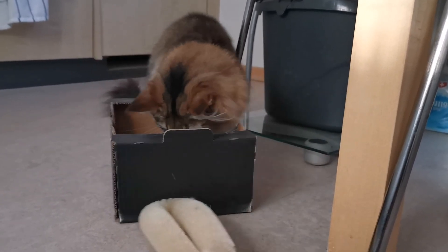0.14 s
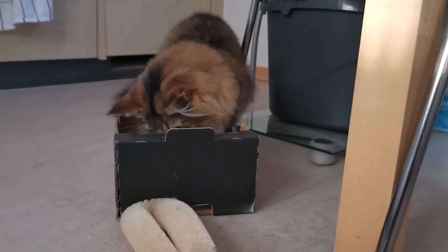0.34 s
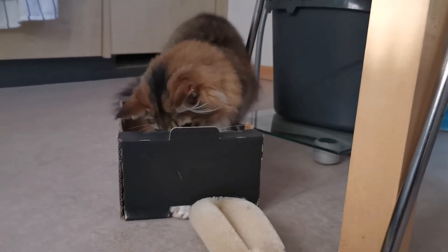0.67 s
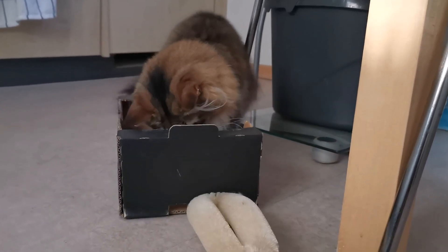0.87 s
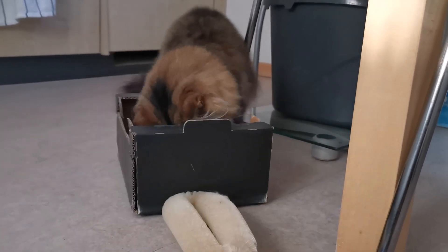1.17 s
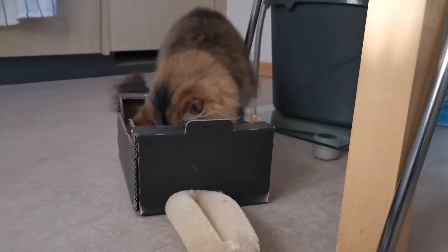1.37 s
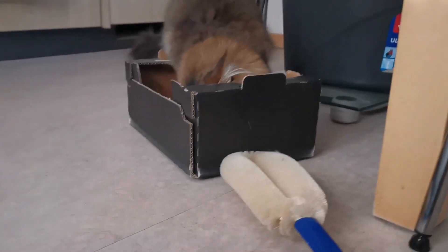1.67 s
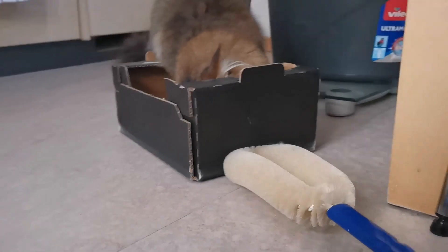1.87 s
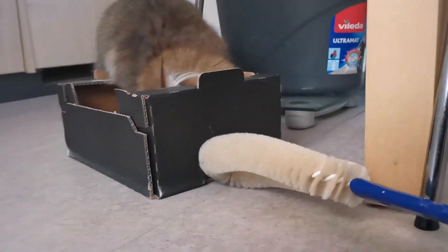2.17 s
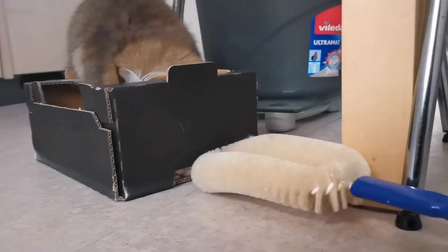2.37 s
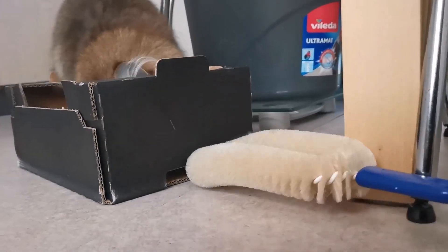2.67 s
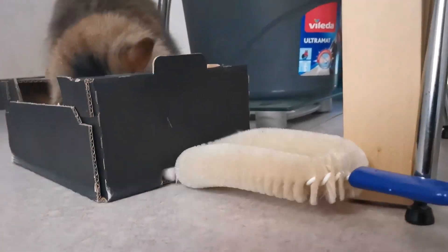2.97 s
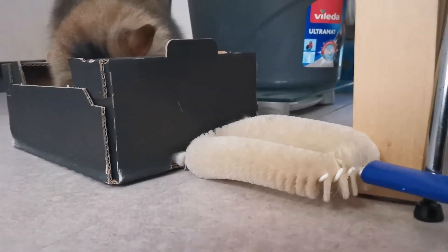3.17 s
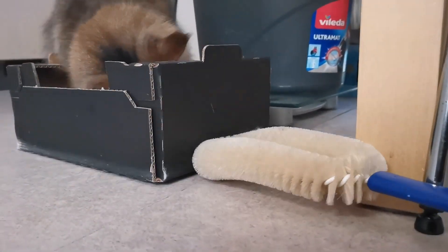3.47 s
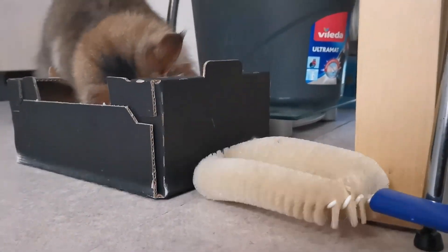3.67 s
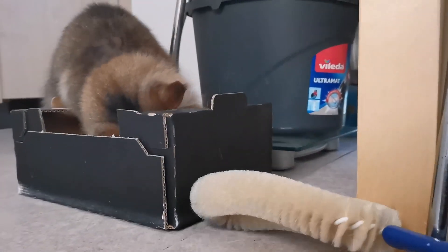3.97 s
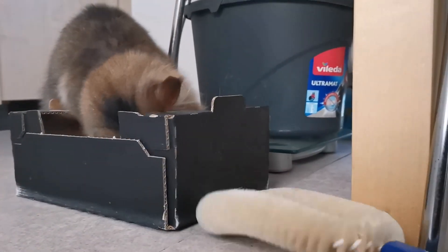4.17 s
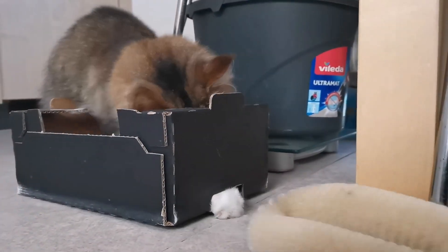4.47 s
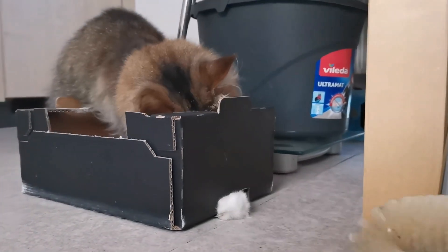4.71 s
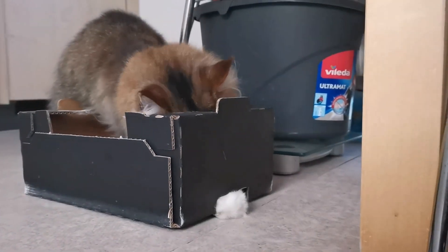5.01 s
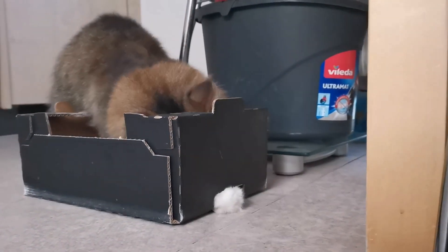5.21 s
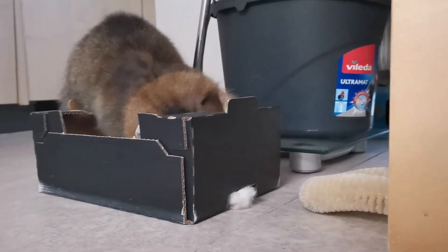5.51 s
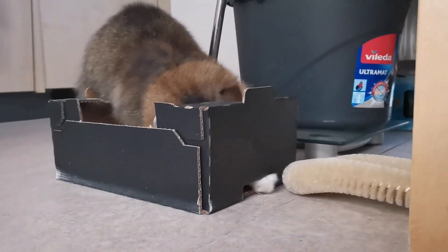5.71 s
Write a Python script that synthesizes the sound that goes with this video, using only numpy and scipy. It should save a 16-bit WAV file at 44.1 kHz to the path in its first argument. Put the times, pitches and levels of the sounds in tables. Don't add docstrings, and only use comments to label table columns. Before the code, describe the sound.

A quiet room with soft steady hiss, heard through a handheld phone near a cat and a cardboard box on a hard floor. At 0.15 s a heavy paw thump rings the hollow box with a short scrape; a weaker one follows at 0.6 s. A bright claw scratch snaps at 0.8 s, then crisp ticks, knocks and rasping at 1.25-1.3 s and again at 1.75-1.85 s. Softer rubbing follows, with light raps near 2.55 s. From 2.8 to 3.7 s knocks and scrapes cluster, with hollow slaps at 3.03 and 3.62 s, while the box creeps with a faint low stick-slip hum. After 4 s it is mostly faint brushing and tiny taps, a small rap at 4.6 s, a short dry rasp at 5.14 s and light taps at 5.4 and 5.6 s. Low grip rumble, bumps and small case clicks come mainly from the right, strongest around 3.9 and 5.3-5.7 s.

```python
import sys
import numpy as np
from scipy import signal
from scipy.fft import rfft, irfft, next_fast_len
from scipy.io import wavfile

SR = 44100
rng = np.random.default_rng(int(sys.argv[2]) if len(sys.argv) > 2 else 0)


def how_loud(loudness_db):
    steps = np.asarray(loudness_db, float) / 20
    return 10 ** steps


def pcm_store(signal):
    levels = np.round(np.clip(np.atleast_2d(signal), -1, 1) * 32767)
    wavfile.write(sys.argv[1], SR, levels.astype(np.int16).T)


N = 257984
SIZE = next_fast_len(N + SR // 2)
HZ = np.maximum(np.arange(SIZE // 2 + 1) * SR / SIZE, 1)
KNOCK_DELAY_S = .002


def in_time(rows):
    s, *columns = np.transpose(rows)
    return [np.interp(np.arange(N) / SR, s, c) for c in columns]


def at_hz(points):
    hz, values = np.transpose(points)
    return np.interp(np.log(HZ), np.log(hz), values)


def rms_one(x):
    return x / np.sqrt(np.mean(x ** 2) + 1e-20)


def drift(rate_hz):
    r = np.exp(-80 * np.pi * rate_hz / SR)
    slow = signal.lfilter([1], [1, -2 * r, r * r], rng.standard_normal(N // 40 + 2002))[2000:]
    return np.interp(np.arange(N) / 40, np.arange(len(slow)), rms_one(slow))


def friction(per_s, spread_db, clump_db):
    sizes = how_loud(spread_db * np.minimum(rng.exponential(1, (3, N)), 4.2)) * rng.choice([-1, 1], (3, N))
    caught = rng.random((3, N)) < per_s / SR
    return rms_one(sizes * caught * how_loud(clump_db * drift(47)))


def resonances(rows):
    return sum(how_loud(db) * 1j * HZ * width / (hz ** 2 - HZ ** 2 + 1j * HZ * width) for hz, width, db in rows)


def echoes(t60_s, gap_ms):
    t = np.arange(SR // 2) / SR - gap_ms / 1000
    cloud = rng.standard_normal((2, SR // 2)) * how_loud(-60 * t / t60_s) * (t > 0)
    return rfft(cloud / np.sqrt(np.sum(cloud ** 2, axis=1, keepdims=True)), SIZE)


# (frequency [Hz], left minus right [dB])
PORT_TILT = [(60, 34), (200, 0), (800, 0.5), (2300, -0.5), (3800, -2), (4900, 7), (5800, -2.5), (6350, 12),
             (6700, 10), (7000, 13.5), (8300, 15.5), (11000, 4), (14000, 5)]
# (frequency [Hz], lead of left [rad])
PORT_LEAD = [(0, 0), (600, .1), (1030, -.8), (1550, .3), (2240, .7), (3100, 3.1), (5080, 3.4), (5860, 6.3),
             (15400, 6.2)]


def ports():
    lead_rad = np.interp(HZ, *np.transpose(PORT_LEAD))
    half = how_loud(at_hz(PORT_TILT) / 2) * np.exp(.5j * lead_rad)
    return np.array([half, 1 / half])


# (frequency [Hz], density [dB per Hz])
HUSH_SPECTRUM = [(59, -39), (100, -5), (291, 1.5), (337, 3), (434, 2), (962, -8.5), (1090, -0.5), (1460, 0),
                 (2370, -6), (2800, -13), (3180, -9), (4000, -10), (5000, -9), (6100, -5), (7400, -4.5),
                 (8300, -20), (10100, -47), (15000, -23)]
# (frequency [Hz], share [0-1])
DIRECT_SHARE = [(200, 1), (650, .97), (1100, .6), (1350, .45), (1800, .45), (2100, .7), (2900, .89),
                (3500, .82), (3900, .55), (4700, .4), (5400, .55), (6100, .92), (7400, .88), (7900, .15),
                (9500, .2), (14500, .75)]


def hush():
    both, *own = rfft(rng.standard_normal((3, N)), SIZE)
    share = np.clip(at_hz(DIRECT_SHARE) - .1, 0, 1)
    white = share * both + np.sqrt(1 - share ** 2) * np.array(own)
    hiss = irfft(white * how_loud(at_hz(HUSH_SPECTRUM)) * ports(), SIZE)[:, :N]
    return how_loud(-57.5 + 0.62 * drift(6.4)) * rms_one(hiss)


# (time [s], level [dB])
GRIP_RUMBLE = [(0, -69), (.5, -74.5), (1.14, -70.5), (1.32, -57), (1.45, -65), (1.71, -57), (1.99, -66.5),
               (2.3, -62), (2.83, -68), (3.19, -57.5), (3.5, -65), (3.93, -51.5), (4.09, -67.5),
               (5.08, -67), (5.53, -56), (5.85, -72)]


def rumble():
    low = signal.butter(1, [22, 110], "band", fs=SR, output="sos")
    top = signal.butter(2, 330, fs=SR, output="sos")
    lumps = how_loud(1.83 * drift(42))
    right, own = signal.sosfilt(np.vstack([low, top]), rng.standard_normal((2, N))) * lumps
    pair = np.array([how_loud(-11.5) * right + how_loud(-13) * own, right]) / np.std(right)
    return how_loud(in_time(GRIP_RUMBLE)[0] + 10) * pair


# (time [s], peak [dB], pitch [Hz], length [cycles], left minus right [dB])
GRIP_BUMPS = [(0.871, -45, 91.5, 1.4, -1), (1.234, -31, 76.5, 1, -21), (1.47, -48, 83.4, 2.3, -24),
              (1.749, -31, 146, 2, -15), (1.921, -38.5, 159, 2.2, -26), (2.449, -38.5, 118, 1.5, -21),
              (2.774, -27.5, 56, 2.65, -14), (3.049, -38, 50.7, 1.4, -11), (3.699, -37, 118, 2.4, -14),
              (3.893, -30, 165, 2, -29), (3.915, -33, 105, 1.4, -20), (3.958, -37, 66, 1.7, -14),
              (5.089, -36.5, 67.5, 0.75, -26), (5.316, -32.5, 56.5, 0.6, -23),
              (5.541, -29.5, 103, 1.7, -24), (5.589, -41, 61.9, 1.8, -20), (5.716, -38, 156, 3.4, -16)]


def bumps():
    out, t = np.zeros((2, N)), np.arange(4000) / SR
    for s, peak_db, hz, cycles, pan_db in GRIP_BUMPS:
        phase = np.minimum(t * hz / cycles, 1)
        pulse = np.sin(2 * np.pi * hz * t) * np.sin(np.pi * phase ** .6) ** 2.2
        peak_s = 0.345 * cycles / hz
        creak = np.sin(2 * np.pi * 480 * t) * np.exp(-((t - peak_s) / .0016) ** 2)
        at = round(s * SR)
        out[:, at:at + 4000] += how_loud(peak_db + 4.5) * (pulse + how_loud(-18) * creak) * how_loud([[pan_db], [0]])
    return out


# (time [s], peak [dB])
CASE_CLACKS = [(3.8945, -36), (3.9675, -27), (5.09, -44), (5.3154, -30), (5.49, -42), (5.5445, -38),
               (5.7208, -35)]


def clacks():
    out, t = np.zeros((2, N)), np.arange(4000) / SR
    ring = np.sin(2 * np.pi * 450 * t) * np.exp(-t / .0012)
    for s, peak_db in CASE_CLACKS:
        at = round(s * SR)
        out[:, at:at + 4000] += how_loud(peak_db + 3.5) * ring * how_loud([[-15], [0]])
    return out


# (time [s], level [dB])
CREEP_LEVEL = [(2.84, -64), (2.904, -64), (3.052, -53), (3.572, -54), (3.62, -57)]
# (frequency [Hz], width [Hz], level [dB])
CREEP_MODES = [(455, 40, 0), (600, 60, -6), (1760, 43, -7), (2370, 110, -12)]


def creep():
    rings = resonances(CREEP_MODES) / (1 + (HZ / 3000) ** 6)
    hum = rms_one(irfft(rfft(friction(2500, 2.5, 1.5)[0], SIZE) * rings, SIZE)[:N])
    s, db = np.transpose(CREEP_LEVEL)
    return hum * how_loud(np.interp(np.arange(N) / SR, s, db + 3.5, left=-120, right=-120))


# (time [s], level [dB], tilt above the main mode [dB per octave])
BOX_SLAPS = [(.1575, -22.5, 6.5), (.6215, -25.5, 1), (1.8145, -30, 9), (1.836, -30, 6), (3.029, -32, 6),
             (3.618, -29, 6)]
# (frequency [Hz], level [dB], T60 [s])
HOLLOW_MODES = [(238, -8, .12), (422, 0, .12), (600, -8, .1), (716, -9, .095), (850, -7, .085),
                (1115, -12, .12), (2275, -21, .08)]


def slaps():
    out, t = np.zeros(N), np.arange(8000) / SR
    onset = np.minimum(t / .002, 1)
    for s, db, tilt_db in BOX_SLAPS:
        for hz, mode_db, t60_s in HOLLOW_MODES:
            level_db = db + mode_db + tilt_db * np.log2(hz / 422) - 60 * t / t60_s
            ring = np.sin(2 * np.pi * (hz * t + rng.random()))
            out[round(s * SR):][:8000] += how_loud(level_db) * onset * ring
    return out


# (time [s], peak [dB], pitch [Hz])
CLAW_TICKS = [(0.5781, -42, 6180), (0.6518, -35, 6880), (0.7995, -16, 6890), (1.2579, -22, 6200),
              (1.2779, -14, 5700), (1.2959, -16, 6910), (1.7498, -22, 6580), (1.8147, -23, 5640),
              (1.8301, -18, 7170), (2.0846, -38, 5770), (2.1963, -35, 6700), (2.2377, -27, 6020),
              (2.5685, -32, 3680), (2.5779, -27, 3840), (2.823, -41, 6910), (2.9022, -39, 7110),
              (3.0823, -33, 7340), (3.3003, -27, 3760), (3.4155, -39, 7260), (3.4445, -39, 3830),
              (3.4599, -34, 3800), (3.6286, -18, 5660), (3.8396, -34, 5900), (4.2102, -37, 6250),
              (4.3515, -39, 4420), (5.0952, -38, 6010), (5.1227, -31, 3670), (5.397, -41, 5800),
              (5.403, -40, 5830), (5.611, -30, 7010), (5.6424, -38, 5660)]


def ticks():
    out, t = np.zeros(N + 400), np.arange(400) / SR
    for s, db, hz in CLAW_TICKS:
        age = hz * t / 3.5
        out[round(s * SR):][:400] += how_loud(db - 1.5) * np.sin(2 * np.pi * hz * t) * age * np.exp(-age)
    return out[:N]


# (time [s], thud [dB], rap [dB re thud], panel pitch [Hz])
PAD_KNOCKS = [(.153, -10.5, -10, 790), (.617, -18.5, -12, 760), (.652, -35, 8, 434), (1.243, -31, 2, 740),
              (1.836, -27, 10, 596), (2.53, -36.5, -10, 815), (2.55, -30.5, -6, 955), (2.591, -40, 14, 754),
              (2.882, -46, -10, 460), (3.027, -26, 3.5, 888), (3.052, -35.5, 9, 603), (3.617, -28, 4, 544),
              (3.7, -29.5, 2.5, 460), (3.965, -40, -14, 545), (4.494, -54, 7, 470), (4.592, -45, 12, 857)]
# (time [s], thud [dB], rap [dB re thud], panel pitch [Hz])
CLAW_KNOCKS = [(.773, -31.5, -18, 423), (.798, -26.5, 5, 705), (.82, -29, -6, 608), (1.267, -28, -3, 423),
               (1.277, -27, 8, 706), (1.749, -33, 4, 365), (1.813, -29, -9, 747), (2.059, -41.5, -4, 915),
               (2.577, -33, -1, 740), (2.8, -43, -8, 1000), (2.961, -39, -1, 780), (3.087, -33, -3, 516),
               (3.299, -32, 1.5, 524), (3.443, -38, 3, 452), (3.628, -27, -1.5, 600), (4.205, -47, -9, 568),
               (4.351, -49, -5, 571), (5.4, -44, -2, 327), (5.61, -41, 9, 396)]


def thuds(cycles):
    out, t = np.zeros(N + 2000), np.arange(2000) / SR
    for s, thud_db, _, hz in PAD_KNOCKS + CLAW_KNOCKS:
        at = round((s + KNOCK_DELAY_S + .0003) * SR)
        swing = np.sin(2 * np.pi * hz * t) * np.sin(np.pi * np.minimum(hz * t / cycles, 1))
        out[at:at + 2000] += how_loud(thud_db + 5) * swing
    return out[:N]


CRUNCH_MS = [3.2, 1.63, 2.6, 8]


def knocks(band):
    clicks = np.zeros(N)
    for rows, snap_db in (PAD_KNOCKS, -17), (CLAW_KNOCKS, -2.5):
        s, thud_db, rap_db, _ = np.transpose(rows)
        level_db = thud_db + (band > 0) * rap_db + (band > 1) * snap_db
        clicks[np.round((s + KNOCK_DELAY_S) * SR).astype(int)] = how_loud(level_db)
    fade = np.exp(-1000 / (CRUNCH_MS[band] * SR))
    crunch = signal.lfilter([1], [1, -fade], clicks) * rng.standard_normal(N)
    return crunch + how_loud(6) * clicks


def stroke(s, db, swell_s, fade_s):
    late = np.arange(0, N + 32, 32) / SR - s
    return how_loud(2 * (db - 20 * np.maximum(-late / swell_s, late / fade_s)))


# (start [s], claw rasp [dB], paw weight [dB re rasp], bristle [dB re rasp], 20 dB fade [s])
PAW_SWIPES = [(0.161, -31.5, 1.5, -14.0, 0.095), (0.625, -41.5, 4.5, -22.5, 0.071),
              (0.801, -23.5, -9.5, -2.5, 0.084), (1.279, -28.0, -2.0, 1.0, 0.111),
              (1.752, -39.0, -18.5, 4.5, 0.089), (1.823, -43.5, 15.0, 8.0, 0.041),
              (1.834, -27.0, -7.0, -2.5, 0.1), (2.551, -49.5, -3.5, -16.5, 0.101),
              (2.81, -51.5, 7.5, -2.0, 0.072), (2.886, -47.0, 5.0, -7.5, 0.336),
              (2.966, -39.5, 7.5, -3.0, 0.157), (3.034, -31.5, -1.5, -13.0, 0.084),
              (3.086, -47.0, 9.0, -0.5, 0.099), (3.206, -53.0, 8.0, -14.0, 0.04),
              (3.299, -39.5, -3.0, -2.0, 0.068), (3.354, -43.0, 8.0, -3.0, 0.025),
              (3.624, -26.5, -4.5, -6.0, 0.117), (3.701, -48.0, -9.5, -5.0, 0.35),
              (4.203, -54.0, 5.5, 0.0, 0.188), (4.352, -57.0, -1.5, 8.0, 0.048),
              (4.496, -51.5, -7.0, -7.0, 0.072), (4.593, -34.5, -13.5, -11.5, 0.074),
              (5.395, -47.5, -1.5, -7.0, 0.112), (5.606, -52.5, 3.5, 2.5, 0.233)]
# (peak [s], claw rasp [dB], paw weight [dB re rasp], bristle [dB re rasp], 20 dB swell [s])
PAW_DRAGS = [(0.23, -55.5, 11.0, 10.0, 0.161), (0.339, -41.5, -4.0, -2.5, 0.249),
             (0.591, -56.5, -5.5, -2.5, 0.234), (0.654, -40.5, -8.5, -9.0, 0.025),
             (0.798, -35.0, 8.0, -3.5, 0.025), (1.159, -52.0, 3.5, -6.0, 0.108),
             (1.264, -37.5, -2.5, 0.0, 0.075), (1.576, -47.5, -0.5, 3.0, 0.15),
             (1.735, -49.0, 5.0, -3.5, 0.065), (1.802, -41.5, -12.5, -0.5, 0.027),
             (2.132, -51.5, 6.0, -3.5, 0.122), (2.246, -41.5, 5.0, 5.0, 0.107),
             (2.587, -34.0, 2.0, -8.0, 0.066), (3.246, -49.5, 7.5, -15.5, 0.061),
             (3.499, -41.5, 4.5, -2.5, 0.15), (3.906, -63.5, 12.5, 7.5, 0.044),
             (3.973, -69.5, 23.0, 5.5, 0.235), (4.368, -53.5, 6.5, -11.5, 0.075),
             (4.525, -61.0, 13.0, 11.0, 0.035), (4.744, -70.0, -15.5, 22.0, 0.57),
             (5.028, -82.0, 11.5, 27.5, 0.8), (5.142, -36.0, -3.5, -6.5, 0.073),
             (5.324, -52.0, 4.0, -4.5, 0.23), (5.564, -62.0, 7.0, 10.0, 0.344)]
FADE_SHARE = [1.1, 1.48, 1.46, 1.4]
# (peak [s], level [dB], 20 dB swell [s], 20 dB fade [s])
FUR_SWEEP = (4.72, -66, .585, .2)


def rub_levels():
    strokes = []
    for *row, fade_s in PAW_SWIPES:
        swell_s = .0075 * how_loud(-.45 * (row[1] + 40))
        strokes.append((*row, swell_s, fade_s))
    for row in PAW_DRAGS:
        strokes.append((*row, .109))
    power = [0, 0, 0, 0]
    for s, rasp_db, weight_db, bristle_db, swell_s, fade_s in strokes:
        hiss_db = rasp_db + bristle_db
        fur_db = -74.5 + .72 * (hiss_db + 50)
        for band, db in enumerate([rasp_db + weight_db, rasp_db, hiss_db, fur_db]):
            power[band] = power[band] + stroke(s, db, swell_s, fade_s * FADE_SHARE[band])
    power[3] = power[3] + stroke(*FUR_SWEEP)
    return [np.interp(np.arange(N) / 32, np.arange(len(p)), 10 * np.log10(p + 1e-14)) for p in power]


# (low edge [Hz], high edge [Hz])
RUB_BANDS = [(240, 1300), (1300, 3300), (3300, 9200), (9200, 16000)]
# (frequency [Hz], density [dB per Hz])
BOARD_COLOUR = [(150, -4), (260, -5), (450, -5), (1000, -3), (1350, -5.5), (2000, -5), (2600, -5),
                (3150, -6), (3750, -8), (4600, -9.5), (6000, -8), (7300, -7.5), (8300, -21), (10000, -33.5),
                (12000, -40), (15000, -36.5)]


def board_drive():
    grains = [friction(1500, 2.86, 2.15), friction(3000, 3.7, 0.88),
              friction(6000, 3.1, 1.3), friction(9800, 2.6, 1.8)]
    rub_gain_db, hit_gain_db = [-6, -3, -2.5, 13], [-9.5, -1.5, -1.5, -28]
    levels, drive = rub_levels(), 0
    for band, edges in enumerate(RUB_BANDS):
        sos = signal.butter(2, edges, "band", fs=SR, output="sos")
        response = signal.sosfreqz(sos, HZ[::64], fs=SR)[1].repeat(64)[:len(HZ)]
        shape = how_loud(at_hz(BOARD_COLOUR)) * response
        even = 1 / np.sqrt(np.mean(np.abs(shape) ** 2))
        rub = how_loud(levels[band] + rub_gain_db[band]) * grains[band]
        hit = how_loud(hit_gain_db[band]) * knocks(band)
        drive = drive + signal.sosfilt(sos, even * np.vstack([rub, hit]))
    return drive


# (frequency [Hz], width [Hz], then level re broad response rubbed on
# box floor [dB], box wall [dB], outer face [dB], room floor [dB])
BOX_MODES = [(230, 17, 4, 9.5, -2, -9), (293.2, 11.6, 3.5, 14.5, 8, 15.5), (431.5, 27.3, 16.5, 7, 2, 4),
             (460, 40, -5, 4.5, 7, 2.5), (585, 94, 3, 2.5, 3.5, 6), (743, 65, 11, -0.5, 2, -2),
             (884, 67, 6, -1.5, -5.5, -11), (1050, 66, 2, -1, -3, -21), (1293, 26, 3, -8, -3, 0),
             (1752, 82, 4, -0.5, 1.5, -2), (1912, 31, 2.5, -9, 6, -11), (2191, 178, -3, -1, -6, 7),
             (2373, 106, -3.5, 8, -3.5, 6.5), (3718, 364, -3, -10.5, 0, 7),
             (5770, 320, -2.5, -6.5, -15.5, 2.5)]


def box_response(spot):
    rings = resonances([(hz, width, db[spot]) for hz, width, *db in BOX_MODES])
    broad_db = at_hz([(500, -8), (2600, -6), (4200, 0)])
    return how_loud(at_hz(BOARD_COLOUR)) * (how_loud(broad_db) + rings)


# (time [s], spot [0 box floor .. 1 wall .. 2 outer face .. 3 room floor])
RUB_PLACE = [(0, .15), (.82, .89), (1.15, .39), (1.3, 1.33), (1.56, .31), (1.76, 2.54), (1.85, 1.12),
             (2.25, 1.25), (2.75, .35), (3.03, 1.6), (3.2, 1), (3.31, 2), (3.42, 1), (3.5, .53),
             (3.64, 1.84), (3.85, 2.42), (4.6, 3.1), (4.82, 1.7), (5.15, 2.7), (5.85, 2.1)]


def spot_weights():
    where = in_time(RUB_PLACE)[0]
    weights = np.array([how_loud(1.2 * drift(10) - 16 * (where - spot) ** 2) for spot in range(4)])
    return weights / np.sqrt(np.sum(weights ** 2, axis=0))


def box():
    drive = board_drive()
    share, mics, out = np.clip(at_hz(DIRECT_SHARE), 0, 1), ports(), 0
    hidden = np.sqrt(1 - share ** 2)
    soft = 1 / (1 + (HZ / 9500) ** 4)
    for spot, weight in enumerate(spot_weights()):
        near = echoes(t60_s=.071, gap_ms=1.2)
        room = echoes(t60_s=.31, gap_ms=7.2) / (1 + 1j * HZ / 5000) * np.abs(mics)
        rub, left, right, hit = rfft(weight * drive, SIZE) * box_response(spot)
        rub_near = rub * (share + how_loud(-6) * hidden * near) + hidden * np.array([left, right])
        rub_room = rub * how_loud(-11) * hidden ** .7 * room
        struck = (1 + how_loud(-3) * hidden * near) * mics
        out = out + rub_near * mics + rub_room + soft * hit * (struck + how_loud(-5.5) * room)
    out = out + rfft(thuds(cycles=1.75), SIZE) * (mics + how_loud(-9.5) * room)
    tick_mics = mics / np.abs(mics).mean(axis=0)
    out = out + rfft(ticks(), SIZE) * (tick_mics * (1 + how_loud(-8) * near) + how_loud(-14) * room)
    return irfft(out * (HZ ** 2 / (HZ ** 2 + 190 ** 2)), SIZE)[:, :N]


def scene():
    body = rfft(creep() + slaps(), SIZE) / (1 + (170 / HZ) ** 4)
    hollow = irfft(body * ports(), SIZE)[:, :N]
    return hush() + rumble() + bumps() + clacks() + hollow + box()


def low_pass(x):
    return signal.sosfilt(signal.butter(12, 15830, fs=SR, output="sos"), x)


def record(dry):
    cut = signal.cheby2(12, 60, 15600, fs=SR, output="sos")
    mix = signal.sosfilt(cut, dry)
    return low_pass(mix)


dry = scene()
out = record(dry)
pcm_store(out)
```